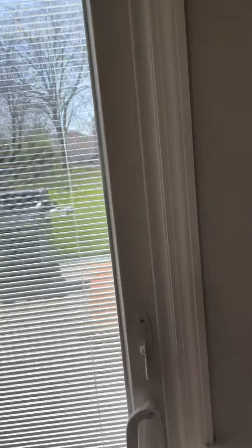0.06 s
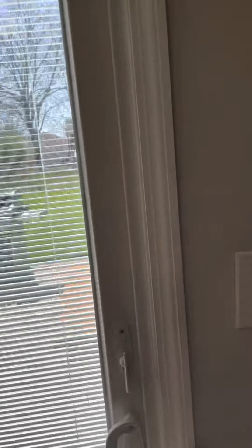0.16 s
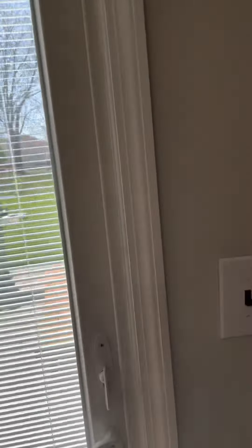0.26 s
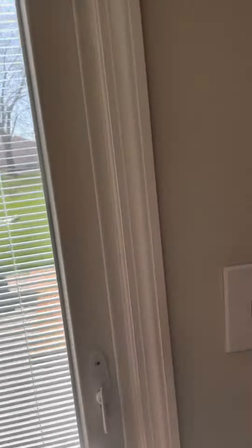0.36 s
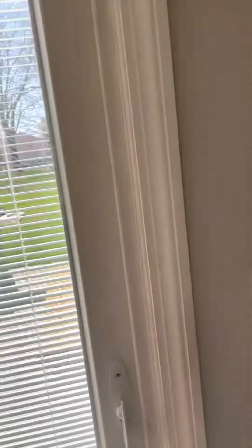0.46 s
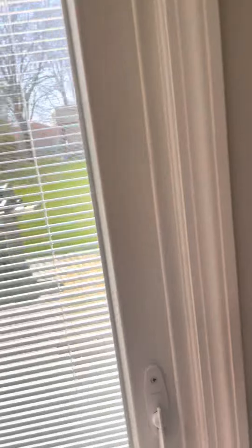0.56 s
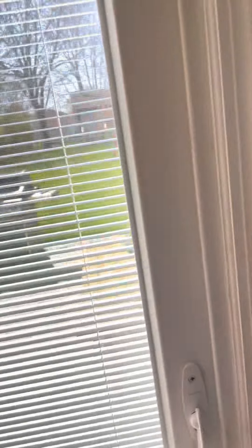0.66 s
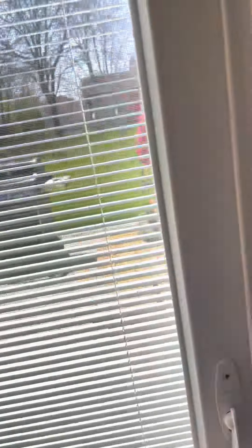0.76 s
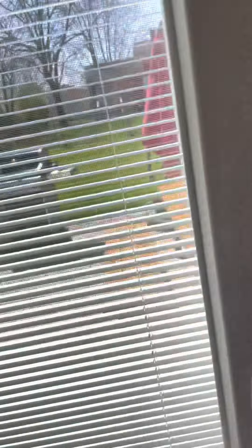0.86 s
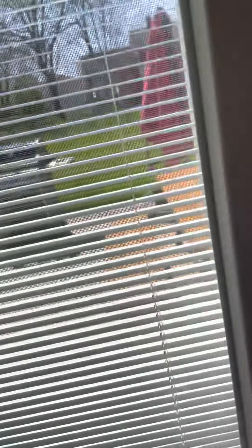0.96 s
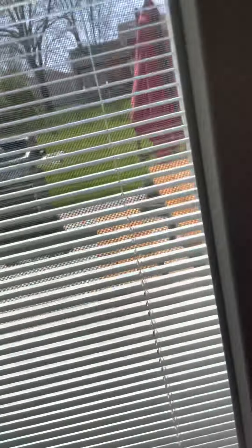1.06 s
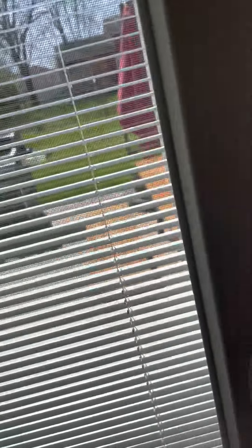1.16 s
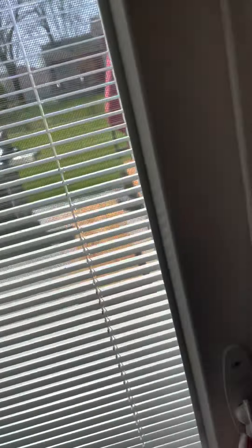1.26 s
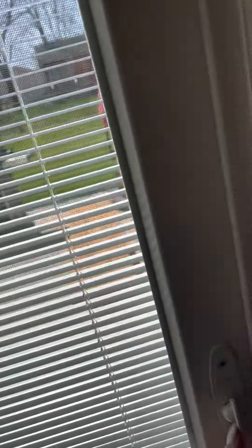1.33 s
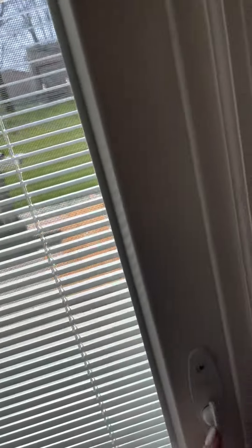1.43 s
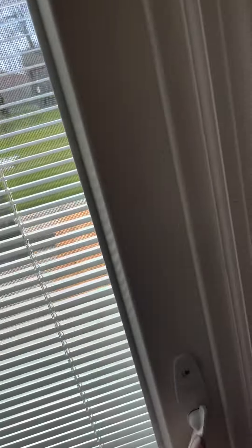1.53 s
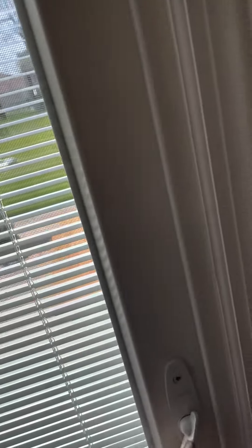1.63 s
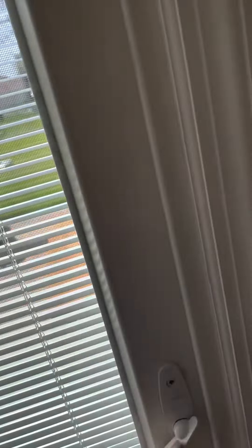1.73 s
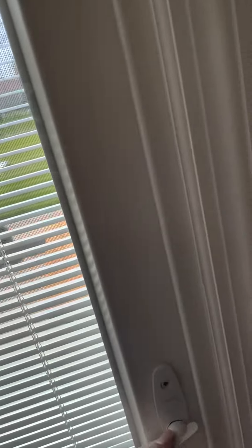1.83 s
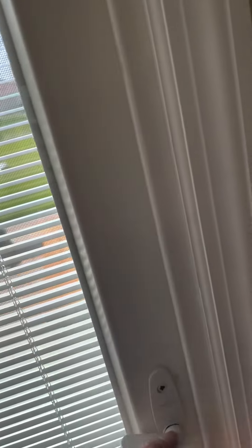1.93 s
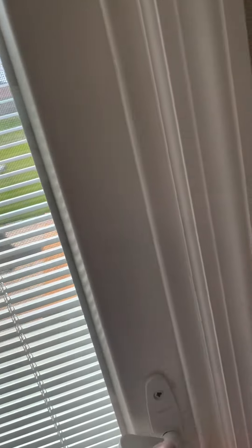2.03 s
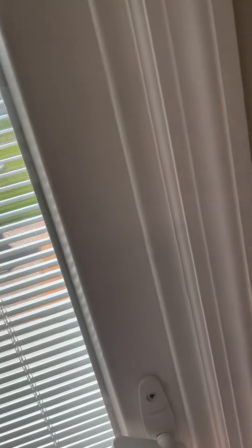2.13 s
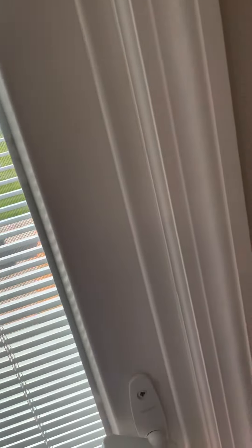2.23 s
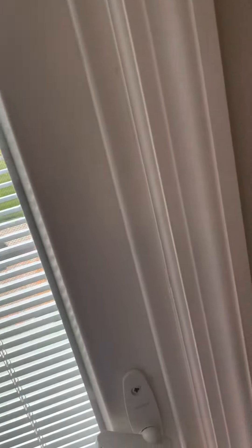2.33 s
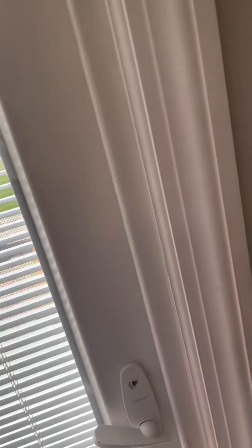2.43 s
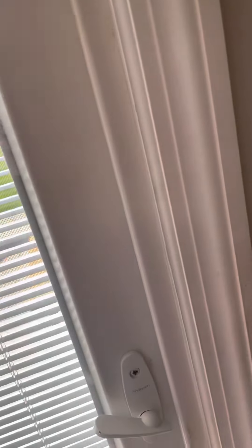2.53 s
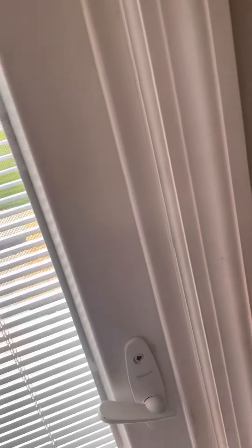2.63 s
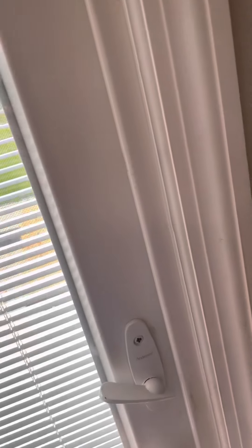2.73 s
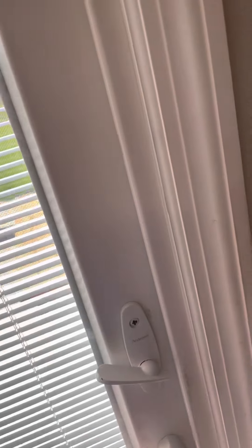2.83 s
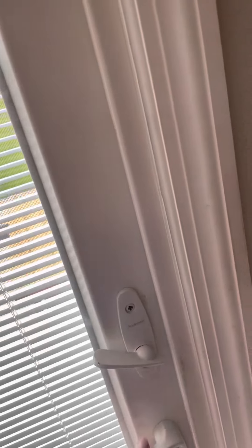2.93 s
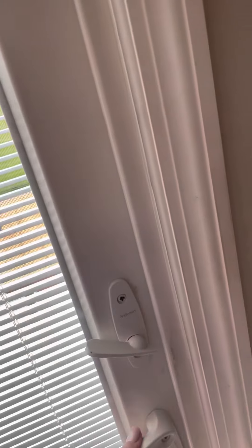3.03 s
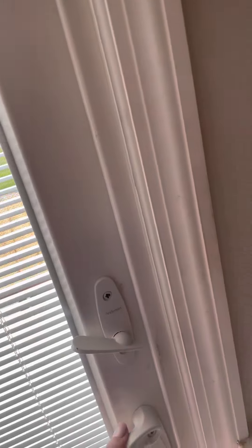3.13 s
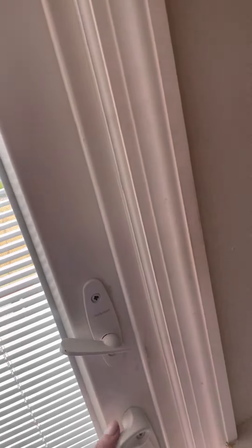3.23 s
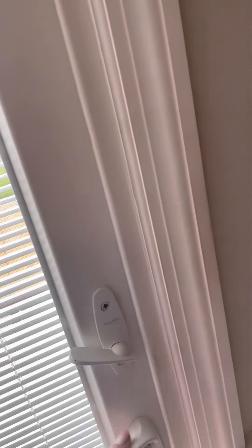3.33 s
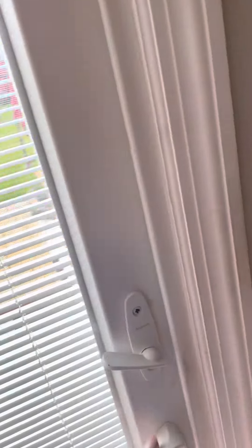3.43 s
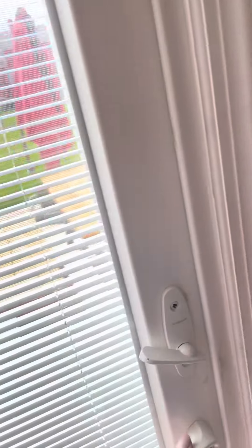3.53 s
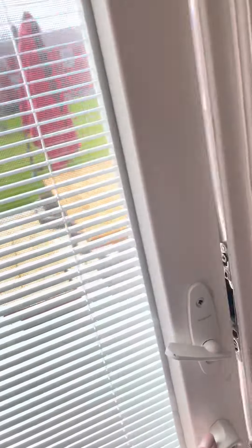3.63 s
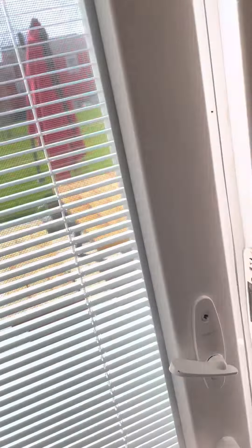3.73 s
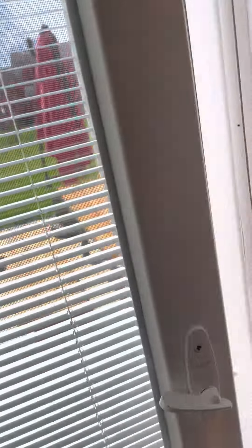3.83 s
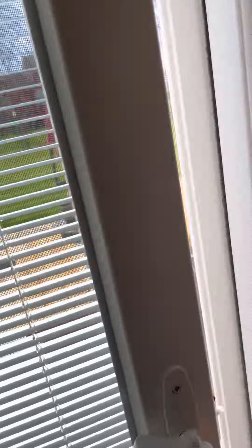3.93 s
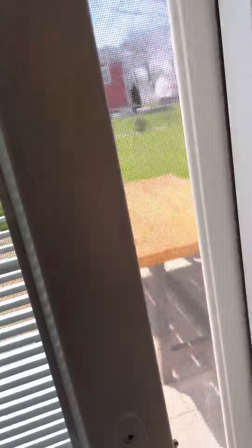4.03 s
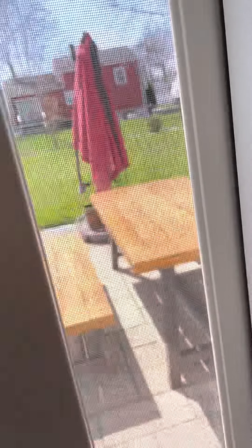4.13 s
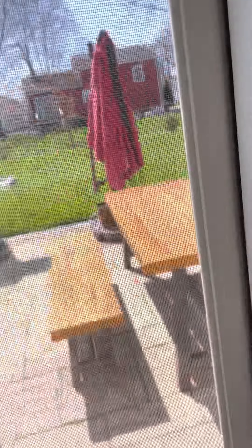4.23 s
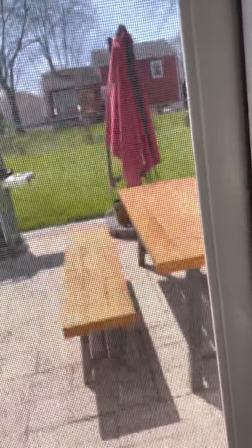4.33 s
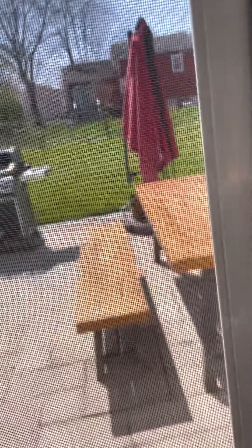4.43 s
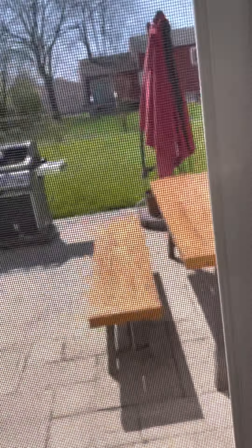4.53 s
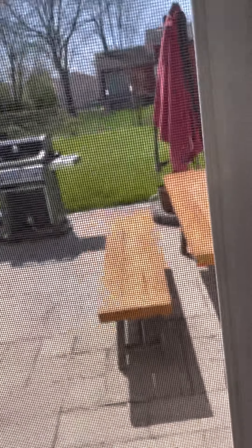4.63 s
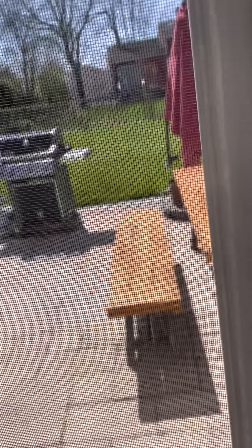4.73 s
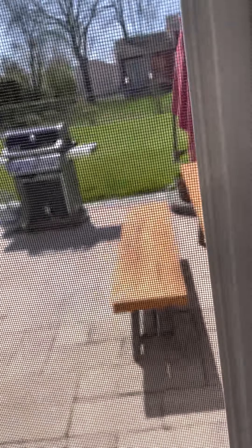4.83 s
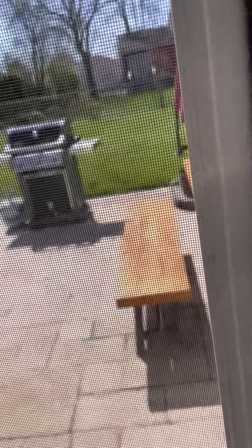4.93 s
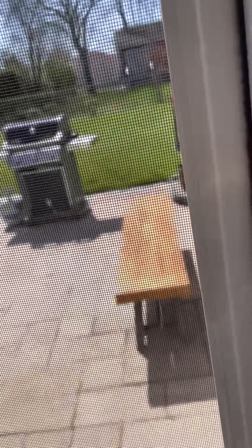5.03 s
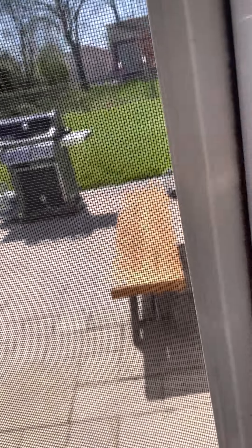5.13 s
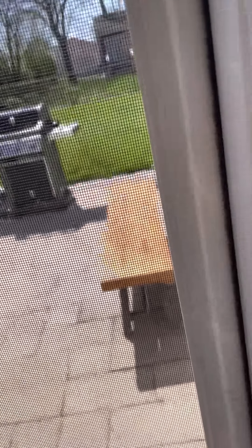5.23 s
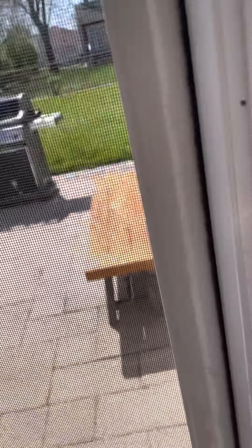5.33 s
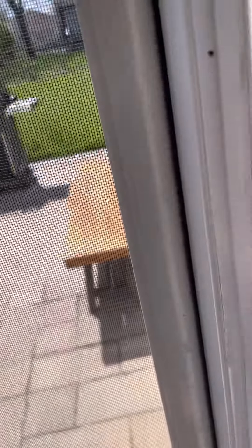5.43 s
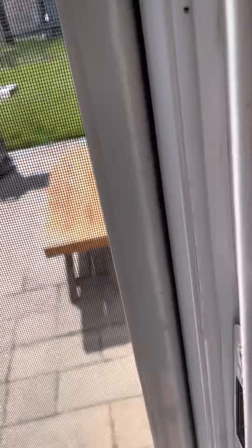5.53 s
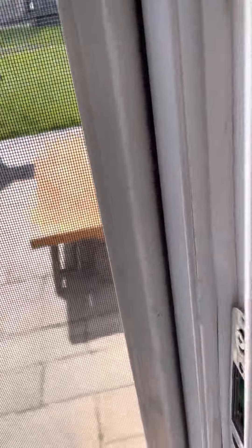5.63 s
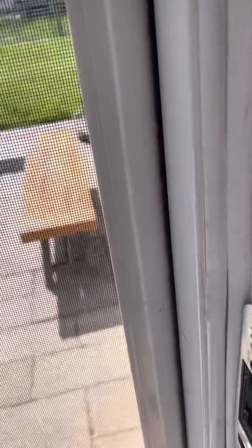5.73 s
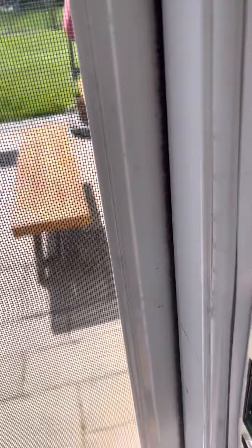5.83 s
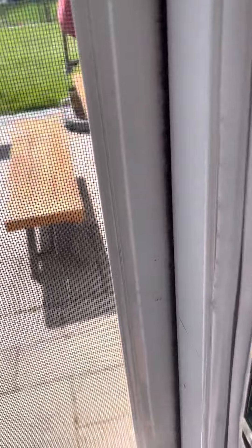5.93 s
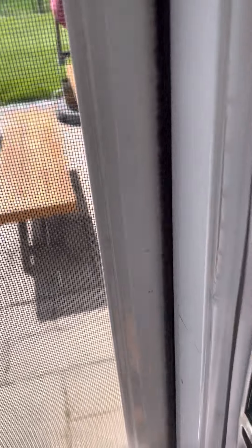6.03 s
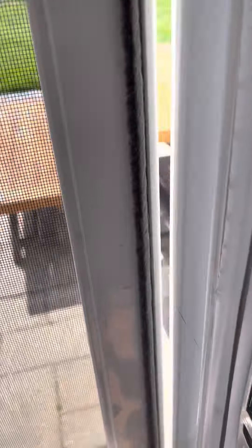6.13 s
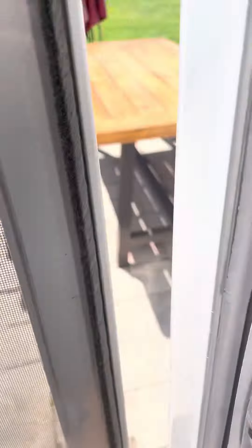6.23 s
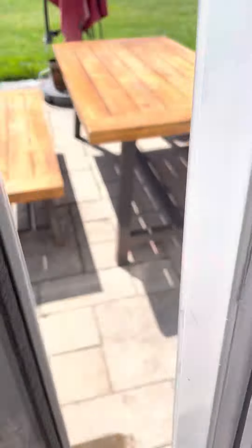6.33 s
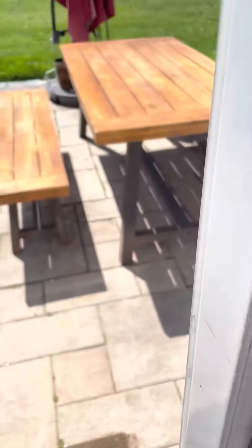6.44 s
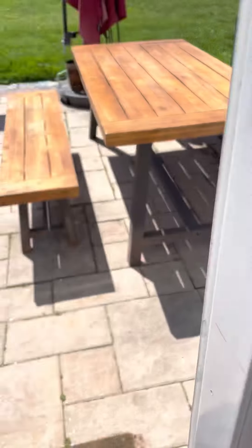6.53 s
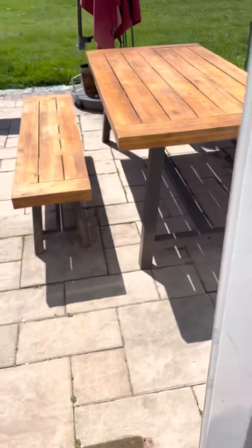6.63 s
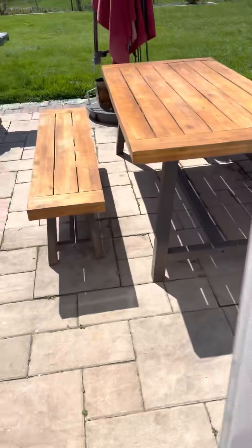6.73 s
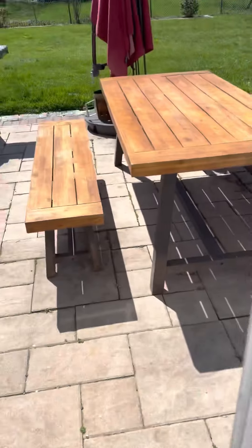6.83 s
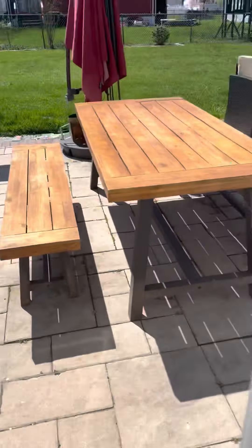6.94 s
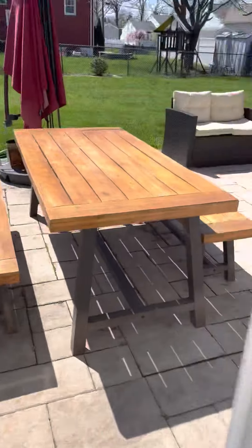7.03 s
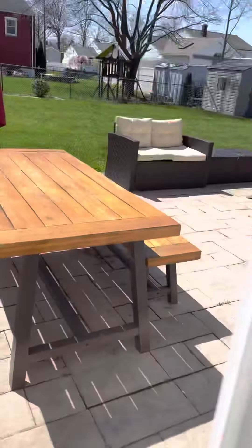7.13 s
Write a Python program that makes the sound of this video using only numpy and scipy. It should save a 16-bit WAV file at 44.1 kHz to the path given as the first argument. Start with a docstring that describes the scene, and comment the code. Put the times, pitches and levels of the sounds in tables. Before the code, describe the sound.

In a small, lightly reverberant room, a few dull heel steps knock and boom on wooden boards with small clicks. A latch snaps over with a sharp metallic clatter and low thump. After quiet handling and cloth rub, a heavy glass door rolls with a bumpy, gritty rumble, slowing to rest. A screen then catches and scrapes hollowly aside. Birds chirp, whistle and squeal. Close handheld stereo phone pickup.

```python
"""Glass patio door and insect screen

Someone walks over a wooden floor, flips a latch, rolls a glass door along its track and slides a screen aside.
Door and screen are friction noise and random impacts driven by speed curves and coloured by body resonances.
Steps, latch parts, knocks and bumps are short decaying hits with a noise room tail; cloth is stroked noise.
Hum and hiss grow as the two doors open; birds whistle, twitter and squeal in sines. A phone hears it in stereo.
"""
import sys
import numpy as np
from scipy import signal
from scipy.fft import rfft, irfft, next_fast_len
from scipy.io import wavfile
from scipy.ndimage import uniform_filter1d, map_coordinates

SR = 44100
rng = np.random.default_rng(int(sys.argv[2]) if len(sys.argv) > 2 else 0)


def bounce(signal):
    """Save signal as a 16-bit WAV file at the path given by the first command-line argument."""
    frames = np.transpose(np.atleast_2d(signal))
    limited = np.clip(frames, -1, 1)
    pcm = np.round(limited * 32767).astype(np.int16)
    wavfile.write(sys.argv[1], SR, pcm)


N = 316440

# glass door, pulled open and coasting to rest: start_s, speed (share of the fastest)
DOOR_SPEED = [(3.44, 0.051), (3.545, 0.13), (3.568, 0.56), (3.72, 0.42), (3.78, 0.61), (3.94, 0.62),
              (4.04, 0.92), (4.11, 0.73), (4.15, 0.88), (4.26, 1), (4.38, 0.79), (4.62, 0.39),
              (4.86, 0.068), (5.02, 0.023)]
# screen, which sticks, is shoved aside and slows: start_s, speed (share of the fastest)
SCREEN_SPEED = [(5.93, 0.011), (5.96, 0.018), (6.21, 0.18), (6.24, 0.49), (6.3, 0.48), (6.32, 0.81),
                (6.355, 0.52), (6.42, 1), (6.49, 0.75), (6.54, 0.54), (6.6, 0.34), (6.82, 0.027), (6.92, 0)]
# colour of the rollers on the track: freq_hz, level_db
ROLLER_COLOUR = [(80, -44), (150, -42), (220, -9), (300, 1), (450, 0.5), (620, -5), (1070, -7.5),
                 (1450, -19.5), (2600, -42)]
# resonances of the glass pane: centre_hz, width_hz, boost_db
PANE_MODES = [(95, 27, 15), (218, 24, 13), (278, 16, 12), (343, 22, 10), (436, 32, 8), (505, 40, 6),
              (634, 24, 5), (748, 40, 4), (870, 170, 3), (1060, 70, 3), (1215, 20, 6), (1265, 25, 5),
              (1920, 130, -4), (2120, 110, 4)]
# colour of the door's drone and the yard's hum: freq_hz, level_db
HUM_COLOUR = [(20, -61), (43, 5.5), (60, 2), (95, -0.5), (144, 0.5), (250, -4.5), (370, -14.5), (600, -21),
              (1200, -50.5)]
# colour of a dull contact: freq_hz, level_db
CLACK_COLOUR = [(200, 6.5), (600, -5), (1100, -6), (1700, -4), (2300, -5.5), (3000, -10.5), (3800, -34),
                (8000, -58)]
# colour of small ringing parts: freq_hz, level_db
RING_COLOUR = [(1500, 1.5), (3200, 9.5), (4600, 4.5), (6300, 3.5), (8500, 0.5), (12000, -5.5)]


def glass_door(rumble_db=-54, drone_db=-45, roller_db=-37.5, bump_db=-43, grit_db=-41.5, crunch_db=-46.0,
               brush_db=-53.5, pane_db=-2.5, rumble_power=0.084, grit_power=0.98, brush_power=0.66):
    """Rollers and grit shake the pane while the weather strip brushes; each grows as a power of the speed."""
    # colours of deep shaking, gritty track and weather strip: freq_hz, level_db
    rumble_colour = [(20, -13), (40, 15), (58, 31.5), (78, -42), (115, 20.5), (170, 2), (300, -47)]
    grit_colour = [(600, 9), (1200, 6.5), (2300, 3.5), (3100, 0.5), (4200, -15), (7000, -58)]
    brush_colour = [(1900, -17), (3200, -0.5), (4600, -5), (5800, -1.5), (7500, -3.5), (10000, -10.5),
                    (13000, -6), (15500, -11), (16200, -31)]
    # the heavy panel lurches: start_s, fall_after_s, rumble_db (ahead of the pane), weather_strip_db
    lurches = [(1.693, 0.15, -42, -78), (3.56, 0.027, -35.5, -53.5), (4.72, 0.12, -48.5, -56)]

    speed = speed_of(DOOR_SPEED)
    rumble = amp(rumble_db) * speed ** rumble_power
    brush = amp(brush_db) * speed ** brush_power
    for start, fall_after, shake_db, strip_db in lurches:
        lurch = stroke(start, fall_after, attack=0.043, fall_db_per_s=198)
        rumble = rumble + amp(shake_db) * lurch
        brush = brush + amp(strip_db) * lurch

    shake = rumble * rush(rumble_colour, grain_db=-3.0, rate=25)
    rolling = amp(roller_db) * rush(ROLLER_COLOUR, grain_db=3.0, rate=190)
    rolling += amp(bump_db) * crackle(ROLLER_COLOUR, rate=79, size_db=4.0, t60=0.045)
    shake += speed * rolling
    gritty = amp(grit_db) * rush(grit_colour, grain_db=2.5, rate=330)
    gritty += amp(crunch_db) * crackle(grit_colour, rate=210, size_db=5, t60=0.027)
    shake += speed ** grit_power * gritty
    drone = amp(drone_db) * speed * rush(HUM_COLOUR, grain_db=-2.0, rate=41)
    strip = brush * rush(brush_colour, grain_db=1.5, rate=310)
    return amp(pane_db) * resonant(shake, PANE_MODES) + drone + strip


def track_bumps(clack_t60=0.028, thump_t60=0.09, clack_trim_db=2, thump_trim_db=-3, room_db=-8):
    """A roller drops off a grain of grit: the wheel clacks and the pane thumps."""
    # strikes on the track: start_s, clack_db, thump_db (both ahead of the trims)
    bumps = [(3.726, -35, -42), (3.765, -46, -30), (3.838, -37, -35), (3.903, -45, -32), (3.970, -34, -38),
             (3.999, -34, -32), (4.031, -37, -34), (4.0555, -32, -30), (4.087, -44, -29), (4.108, -42, -27),
             (4.165, -39, -38), (4.192, -44, -30), (4.237, -35, -31), (4.266, -36, -32), (4.312, -32, -33),
             (4.34, -35, -42), (4.366, -40, -29), (4.42, -37, -35), (4.5309, -41, -37), (4.573, -44, -44)]
    # colour of a roller's clack: freq_hz, level_db
    wheel_colour = [(150, -8), (350, 6), (1050, 1), (1500, -4), (2150, 2), (4000, -15), (6300, -18),
                    (9000, -45)]
    out, thumps = np.zeros((2, N)), np.zeros((2, N))
    t = np.arange(SR // 10) / SR

    def burst(colour, attack, t60):
        """A stereo noise hit with a soft onset and an exponential decay."""
        envelope = (1 - np.exp(-t / attack)) * amp(-60 * t / t60)
        return envelope * coloured(rng.standard_normal((2, len(t))), colour)

    for start, clack_db, thump_db in bumps:
        clack = amp(clack_db + clack_trim_db) * burst(wheel_colour, .0004, clack_t60)
        add(out, start, spread(clack))
        add(out, start, amp(room_db) * echo(clack[0]))
        thump = spread(burst(ROLLER_COLOUR, .002, thump_t60))
        add(thumps, start, amp(thump_db + thump_trim_db) * thump)
    return out + resonant(thumps, PANE_MODES)


def screen_door(frame_db=-39.5, catch_db=-5, scrape_db=-51, scrape_power=0.73):
    """A hollow frame rubs and catches on its rail and rings; the scrape above fades less at low speed."""
    # colours of the frame's rub and the bright scrape: freq_hz, level_db
    frame_colour = [(120, -29), (230, 1.5), (450, -1), (580, -2.5), (800, -4.5), (1050, -3.5), (1450, -5.5),
                    (2100, -8.5), (3100, -15), (4500, -21), (6000, -47)]
    scrape_colour = [(1900, -40), (3200, -5), (4500, -4), (6200, -1), (8000, 5), (10000, -6), (11300, -8),
                     (12500, 3), (14400, -3), (15600, -25)]
    # resonances of the hollow frame: centre_hz, width_hz, boost_db
    tube_modes = [(440, 70, 6), (590, 90, -3), (730, 60, 12), (865, 60, 10), (1040, 90, 5), (1206, 35, 11),
                  (1420, 90, 4), (1640, 110, -4), (1880, 160, 3), (2730, 90, 3), (3045, 60, 10),
                  (3190, 60, 7)]
    speed = speed_of(SCREEN_SPEED)
    catches = crackle(frame_colour, rate=140, size_db=3.5, t60=0.02)
    contact = rush(frame_colour, grain_db=0.5, rate=300) + amp(catch_db) * catches
    rub = amp(frame_db) * speed * contact
    scrape = amp(scrape_db) * speed ** scrape_power * rush(scrape_colour, grain_db=2.0, rate=560)
    return resonant(rub, tube_modes) + scrape


def clicks(t60=0.022, lead=0.019, slip_db=-19, clack_db=5, ring_db=6, tick_db=-8, room_db=-6):
    """Plastic and metal parts slip briefly, then snap home; a harder contact clacks less and ticks more."""
    # latch, handle and screen catch: contact_s, level_db (ahead of the layer levels), hardness_db
    contacts = [(0.2325, -48.5, 16.5), (0.3576, -58, 25.5), (0.362, -61.5, 24), (0.71, -53, -2),
                (1.1901, -52.5, -24.5), (1.3566, -70.5, -34.5), (1.4354, -56.5, -11), (1.4996, -48.5, -7),
                (1.517, -47.5, 7), (1.7117, -39, 10.5), (1.7191, -38, -9), (1.773, -35, 6.5),
                (1.794, -52, 0), (1.8334, -48.5, 8.5), (1.9033, -57, -12), (1.949, -54.5, -8),
                (1.985, -51.5, 12), (2.195, -57.5, 11), (2.6, -50, 7.5), (2.8403, -53, 10.5),
                (3.077, -57, 6), (3.2019, -48, 9.5), (3.562, -41.5, 8), (3.6676, -34.5, 12),
                (4.7924, -49, -19.5), (4.931, -58, -9), (5.207, -45, 12.5), (5.8072, -47, 10),
                (5.886, -53, 13), (5.95, -45.5, 11), (5.969, -49.5, 3.5), (6.009, -47, -4),
                (6.0532, -47, 0), (6.092, -45, 1), (6.1146, -35.5, 11), (6.215, -48, -14),
                (6.2316, -40.5, -10), (6.3113, -46, -6), (6.563, -44.5, 7), (6.5779, -39, 15),
                (6.588, -42.5, 8), (6.656, -43, 14), (6.891, -58.5, 3), (6.964, -57, -14)]
    # colour of the sharpest layer: freq_hz, level_db
    tick_colour = [(5000, -34), (8500, -1.5), (13000, -4), (15500, -4), (16500, -9)]
    clack_loss, tick_gain = .45, 1.2  # dB per dB of hardness
    before = .02  # s of slipping ahead of the contact
    out, t = np.zeros((2, N)), np.arange(SR // 12) / SR - before
    for contact, db, hardness in contacts:
        layers = [(CLACK_COLOUR, clack_db - clack_loss * hardness, t60 * 2.38),
                  (RING_COLOUR, ring_db, t60),
                  (tick_colour, tick_db + tick_gain * hardness, t60)]
        hit = 0
        for colour, level, layer_t60 in layers:
            slip = amp(slip_db + 20 * t / lead)  # swells by 20 dB per lead
            decay = amp(-60 * np.abs(t) / layer_t60)
            shape = uniform_filter1d(np.where(t < 0, slip, decay), size=50)
            hit = hit + amp(db + level) * shape * coloured(rng.standard_normal((2, len(t))), colour)
        add(out, contact - before, spread(hit))
        add(out, contact - before, amp(room_db) * echo(hit[0]))
    return out


def chatter(level_db=-2):
    """Loose latch parts and gritty spots of the track chatter in quick runs of small clacks."""
    # runs: start_s, length_s, level_db (ahead of the overall level)
    runs = [(1.173, .05, -61), (1.872, 0.13, -51), (6.24, 0.048, -49)]
    envelope = np.zeros(N)
    for start, length, db in runs:
        add(envelope, start, amp(db) * signal.windows.tukey(round(length * SR), .1))
    return amp(level_db) * envelope * crackle(CLACK_COLOUR, rate=160, size_db=6, t60=0.012)


def knocks(tap_db=2, bolt_db=1.5, snap_db=0, thud_db=-6.5, room_db=-15):
    """Frame, lock case and latch spring ring in decaying modes; floor or pane answers a jolt with one low note."""
    # screen frame on its rail, bolt in the lock case, latch spring letting go: start_s, level_db (untrimmed)
    frame_taps = [(5.748, -20.5), (5.918, -30)]
    bolt_knocks = [(1.7195, -28), (1.7235, -31), (1.7742, -23.5), (1.7805, -30), (1.801, -35),
                   (1.8715, -39), (1.877, -37), (1.882, -30), (1.8985, -39), (1.9065, -36), (1.9245, -33.5),
                   (1.9665, -26), (1.9835, -35), (2.704, -50), (3.122, -46)]
    spring_snaps = [(1.7132, -24.5)]
    # modes of rail, lock case and spring: freq_hz, level_db, t60_s
    rail_modes = [(1378, -12, .02), (1540, -25, .09), (1707, -6, .015), (1879, -2, .022), (2080, -11, .014),
                  (3461, -25, .02), (5900, -22, .011)]
    lock_modes = [(520, -13, .02), (964, -9, .028), (1360, -9, .028), (1700, -6, .013), (1940, -9, .02),
                  (2290, -13, .016), (3180, -17, .03), (3480, -16, .025), (4540, -24, .025)]
    spring_modes = [(5250, -7, .012), (5850, -2, .014)]
    # jolts of floor or pane: start_s, level_db (untrimmed), pitch_hz, t60_s
    thuds = [(0.203, -27.5, 133, 0.24), (1.719, -27, 210, 0.04), (1.731, -19, 163, 0.076),
             (1.735, -26.5, 72.4, 0.22), (3.589, -12, 112, 0.016), (3.769, -18.5, 244, 0.034),
             (6.667, -19.5, 81, 0.061), (6.693, -21, 48.3, 0.2)]
    out, t = np.zeros((2, N)), np.arange(SR // 3) / SR
    bodies = [(frame_taps, rail_modes, tap_db),
              (bolt_knocks, lock_modes, bolt_db),
              (spring_snaps, spring_modes, snap_db)]
    for blows, modes, trim_db in bodies:
        for start, db in blows:
            ring = np.zeros(len(t))
            for hz, level, t60 in modes:
                # each blow excites the modes a little differently
                ring += amp(level + rng.normal(0, 1.5) - 60 * t / t60) * np.sin(2 * np.pi * hz * t)
            ring *= amp(db + trim_db) * (1 - np.exp(-t / 0.0012))
            add(out, start, ring)
            add(out, start, amp(room_db) * echo(ring))
    for start, db, hz, t60 in thuds:
        envelope = amp(db + thud_db - 60 * t / t60) * (1 - np.exp(-t / 0.0003))
        add(out, start, envelope * np.sin(2 * np.pi * hz * t))
    return out


def footsteps(glide=0.62, swell=1.57, sharpness=6, knock_ratio=1.64, knock_t60=0.019, knock_trim_db=8.5,
              knock_room_db=1, boom_trim_db=-2.5, boom_lag=0.01, boom_hold=0.057, boom_fall_db_per_s=110):
    """A heel knocks and sends a bending wave through the floor: high part first, then the boards boom."""
    # heels: start_s, wave_db, base_pitch_hz (ahead of glide and ratio), knock_db and boom_db (untrimmed, re wave)
    steps = [(0.1905, -19, 284, -16.5, -1), (0.238, -23.5, 297, -13.5, -3), (0.71, -25.5, 288, -5.5, -6.5),
             (1.1738, -20.5, 287, -19, -8), (1.192, -16, 288, -7, -5.5), (2.581, -29.5, 205, -17, -3.5),
             (2.904, -36.5, 305, -3.5, -4.5), (3.401, -30.5, 283, -3, -7.5), (4.421, -24, 223, -31, -2),
             (6.826, -28.5, 348, -11.5, -4.5)]
    # resonances of the floor: centre_hz, width_hz, boost_db
    board_modes = [(327, 34, 1.5), (402, 66, -4), (497, 33, 4), (640, 130, -4), (798, 60, 9.5)]
    out, t = np.zeros((2, N)), np.arange(SR // 20) / SR
    for start, db, hz, knock_db, boom_db in steps:
        cycles = hz * t
        phase = 0.89 * cycles + glide * (1 - np.exp(-cycles / 0.68))  # pitch falls as the wave passes
        u = cycles / swell
        wave = amp(db) * (u * np.exp(1 - u)) ** sharpness * np.sin(2 * np.pi * phase)
        knock_shape = amp(db + knock_db + knock_trim_db - 60 * t / knock_t60) * (1 - np.exp(-t / 0.00047))
        knock = knock_shape * np.sin(2 * np.pi * knock_ratio * cycles)
        add(out, start, wave + knock)

        boom = echo(wave) + amp(knock_room_db) * echo(knock)
        age = np.arange(boom.shape[-1]) / SR
        fade = np.minimum(age / 0.0028, 1) * amp(-boom_fall_db_per_s * np.maximum(age - boom_hold, 0))
        add(out, start + boom_lag, amp(boom_db + boom_trim_db) * fade * resonant(boom, board_modes))
    return out


def rustle(fidget_db=-7):
    """Cloth and skin rub in short strokes of noise, with stray little ticks of whatever the hand touches."""
    # sleeves, soles and a hand on the handle: start_s, attack_s, fall_after_s, rub_db, swish_db
    strokes = [(0.179, 0.027, 0.2, -60.5, -59.5), (0.703, 0.0029, 0.031, -59, -55.5),
               (0.807, 0.016, 0.12, -57, -67.5), (1.342, 0.1, 0.32, -56.5, -72.5),
               (1.696, 0.046, 0.29, -51, -58), (2.7, 0.082, 0.16, -52.5, -66.5),
               (2.88, 0.02, 0.096, -58.5, -83), (3.039, 0.013, 0.1, -52, -67),
               (3.167, 0.013, 0.17, -58, -68), (3.474, 0.011, 0.027, -46.5, -76),
               (5.059, 0.017, 0.078, -50.5, -61.5), (5.572, 0.023, 0.18, -58.5, -81.5),
               (6.524, 0.019, 0.046, -68, -48.5), (6.76, .025, 0.031, -61, -52.5)]
    # colours of the dull rub and the bright swish: freq_hz, level_db
    rub_colour = [(150, 5), (400, 5.5), (800, -2), (1250, -6.5), (1650, -13), (3500, -20), (6000, -53)]
    swish_colour = [(1500, 5), (2600, 6.5), (4000, 3.5), (6000, 4.5), (8500, 2.5), (13000, -0.5),
                    (16000, -19)]
    rub, swish = np.zeros(N), np.zeros(N)
    for start, attack, fall_after, rub_db, swish_db in strokes:
        move = stroke(start, fall_after, attack, fall_db_per_s=126)
        rub += amp(rub_db) * move
        swish += amp(swish_db) * move
    fidget = amp(fidget_db) * crackle(RING_COLOUR, rate=75, size_db=9.5, t60=0.015)
    bright = rush(swish_colour, grain_db=2.0, rate=69) + fidget
    return rub * rush(rub_colour, grain_db=3.5, rate=130) + swish * bright


def birds(whistle_db=-51, twitter_db=-5, squeal_db=-46, sizzle_db=-54, waver=0.00227):
    """A held whistle, gliding chirps and a rusty call: noise sizzle, then wavering inharmonic partials."""
    # twitter: start_s, length_s, from_hz, to_hz (ahead of the flutter), level_db (ahead of twitter_db)
    chirps = [(5.115, .09, 3400, 3800, -57), (5.468, .04, 3300, 4000, -61), (5.516, .04, 3000, 4000, -60),
              (6.988, .035, 3800, 3870, -52), (7.133, .005, 2900, 2860, -41)]
    # partials of the rusty call: freq_hz (ahead of bend and waver), level_db (relative)
    partials = [(1642, -12), (2492, -10), (2686, -11), (3311, -6), (3505, -9), (3677, -11), (3935, -2),
                (4974, -8), (6008, -9), (6417, 0), (6638, -3), (6837, -3), (7047, -8), (7456, -13),
                (8075, -6)]
    # bend of the rusty call: time_s, pitch_ratio
    bend_points = [(6.96, .997), (7.05, 1.003), (7.11, 1), (7.18, .991)]
    # colour of the sizzle: freq_hz, level_db
    sizzle_colour = [(1200, -7), (2600, -2), (3800, 0), (4400, -5), (5300, -7), (6600, -4), (7500, -10),
                     (8200, -2), (10500, -28), (12800, -10), (15000, -36)]
    whistle_s, whistle_hz, slide_hz, slide_s = 6.457, 3731, 300, .02  # slides down onto its note

    t = np.arange(N) / SR
    note = whistle_hz + slide_hz * np.exp(-np.maximum(t - whistle_s, 0) / slide_s)
    breath = stroke(whistle_s, 0.25, attack=0.025, fall_db_per_s=104)
    whistle = amp(whistle_db) * breath * tone(note * (1 + waver * wobble(61)))
    twitter = amp(twitter_db) * glides(chirps, rough=.055, wet_db=-2)

    bend = curves(bend_points)[0]
    squeal = np.zeros((2, N))
    for hz, db in partials:
        level = db + rng.normal(0, 1.5, (2, 1)) + 2.5 * wobble(30)  # dB, differing from left to right
        squeal += amp(level) * tone(hz * bend + 8 * wobble(140))
    call = stroke(6.985, 0.093, attack=0.06, fall_db_per_s=72)
    sizzle = stroke(6.955, .07, attack=0.06, fall_db_per_s=72) * rush(sizzle_colour, grain_db=2, rate=300)
    return whistle + twitter + amp(squeal_db) * call * unit(squeal) + amp(sizzle_db) * sizzle


def background():
    """Steady low hum and a faint airy hiss; both grow as the two doors open onto the yard."""
    # levels of hum and hiss: shut_db, added_by_open_door_db, added_by_open_screen_db
    hum_levels = (-53, 5, 4)
    hiss_levels = (-76.5, 8, 5)
    # colour of the hiss: freq_hz, level_db
    hiss_colour = [(200, -24), (500, 0.5), (1000, -1), (2000, -7), (4000, -16.5), (8000, -46), (14000, -23)]
    door, screen = opening(DOOR_SPEED), opening(SCREEN_SPEED)

    def level(shut_db, door_db, screen_db):
        """Gain that follows both openings."""
        return amp(shut_db + door_db * door + screen_db * screen)

    hum = level(*hum_levels) * rush(HUM_COLOUR, grain_db=.7, rate=14)
    hiss = level(*hiss_levels) * rush(hiss_colour, grain_db=.7, rate=8)
    return hum + hiss


def speed_of(door):
    """A door's speed at every sample, zero before and after its move."""
    s, speed = np.transpose(door)
    return np.maximum(np.interp(np.arange(N) / SR, s, speed, left=0, right=0), 0)


def opening(door):
    """How far a door has travelled, 0 to 1: its speed summed over time."""
    travel = np.cumsum(speed_of(door))
    return travel / travel[-1]


def stroke(start, fall_after, attack, fall_db_per_s):
    """Envelope that rises over the attack and dies away from fall_after seconds past its start."""
    t = np.arange(N) / SR - start
    return np.clip(t / attack, 0, 1) * amp(-fall_db_per_s * np.maximum(t - fall_after, 0))


def rush(colour, grain_db, rate):
    """Stereo friction noise whose force wanders in dB, with rate knots a second."""
    force = amp(grain_db * wobble(rate))
    return spread(coloured(rng.standard_normal((2, N)) * force, colour))


def crackle(colour, rate, size_db, t60):
    """Stereo stream of tiny random impacts, about rate a second, at rms 1 ahead of the spread."""
    sizes = amp(size_db * np.clip(rng.standard_normal(N), -2, 2))
    blows = (rng.random(N) < rate / SR) * sizes
    decay = amp(-120 * np.arange(SR // 20) / SR / t60)  # power, so twice the dB
    power = signal.fftconvolve(blows ** 2, decay)[:N]
    return spread(coloured(rng.standard_normal((2, N)) * np.sqrt(np.abs(power)), colour))


def glides(rows, rough, wet_db):
    """Short notes that slide from one pitch to another with a slight flutter, and their echo."""
    out = np.zeros((2, N))
    flutter = 1 + rough * wobble(600)
    for start, length, from_hz, to_hz, db in rows:
        n = round(length * SR)
        pitch = np.linspace(from_hz, to_hz, n) * flutter[round(start * SR):][:n]
        note = amp(db) * signal.windows.tukey(n, .7) * tone(pitch)
        add(out, start, note)
        add(out, start, amp(wet_db) * echo(note))
    return out


def tone(hz):
    """A sine of rms 1 that follows a pitch curve."""
    return np.sqrt(2) * np.sin(2 * np.pi * np.cumsum(hz) / SR)


def resonant(x, peaks):
    """x through a body whose resonances are bell-shaped boosts in dB."""
    def body(hz):
        return amp(sum(db / (1 + (2 * (hz - centre) / width) ** 2) for centre, width, db in peaks))
    return filtered(x, body)


def echo(sound):
    """A fresh stereo noise tail of the room for one short sound; each frequency dies at its own speed."""
    # decay of the room: freq_hz, t60_s
    room_decay = [(100, 0.097), (260, 0.39), (700, 0.41), (1800, 0.34), (5000, 0.22), (13000, 0.1)]
    hz, t, z = signal.stft(rng.standard_normal((2, SR // 2)), SR, nperseg=256)
    decay = amp(-60 * t / along(room_decay, hz)[:, None]) * (1 - np.exp(-t / 0.00067))
    tail = signal.istft(z * decay, SR, nperseg=256)[1]
    return spread(signal.fftconvolve(sound[None], tail / np.linalg.norm(tail[0]), axes=1))


def spread(pair):
    """Two signals become middle and filtered side, then left and right."""
    # stereo width: freq_hz, side_db
    side_width = [(60, -31), (220, -21), (380, -14), (700, -5), (2000, -10), (2600, -6), (4700, -2),
                  (5900, -11), (7500, -8), (10200, -25), (12500, -8), (15000, -17)]
    side = filtered(pair[1], lambda hz: amp(along(side_width, hz)))
    return np.array([pair[0] + side, pair[0] - side])


def amp(db):
    """Decibels to gain."""
    return 10 ** (np.asarray(db) / 20)


def unit(x):
    """Scale to rms 1."""
    return x / np.sqrt(np.mean(x ** 2) + 1e-20)


def along(points, hz):
    """Read (Hz, value) points on a log frequency axis."""
    f, v = np.transpose(points)
    return np.interp(np.log(hz + 1), np.log(f + 1), v)


def curves(rows):
    """One value per sample for each column after the time."""
    s, *cols = np.transpose(rows)
    return [np.interp(np.arange(N) / SR, s, c) for c in cols]


def wobble(rate):
    """A smooth random curve, rate knots a second."""
    return map_coordinates(rng.standard_normal(int(N * rate / SR) + 4), [np.arange(N) * rate / SR])


def filtered(x, response):
    """x times a response of frequency."""
    n = x.shape[-1]
    m = next_fast_len(n + 4096)
    return irfft(rfft(x, m) * response(np.fft.rfftfreq(m, 1 / SR)), m)[..., :n]


def coloured(x, colour):
    """x shaped by a (Hz, dB) curve, at rms 1."""
    return unit(filtered(x, lambda hz: amp(along(colour, hz))))


def add(track, start, sound):
    """Mix a sound in at a start time in seconds."""
    part = track[..., round(start * SR):][..., :sound.shape[-1]]
    part += sound[..., :part.shape[-1]]


def scene():
    """All sources; the low mids lean to the left, where the door is."""
    # stereo balance: freq_hz, left_over_right_db
    left_lean = [(60, 0), (130, .6), (280, 2.4), (550, 2.5), (1100, 1.4), (2200, 0), (4500, -.6),
                 (12000, 0)]
    mix = glass_door() + track_bumps() + screen_door()
    mix += clicks() + chatter() + knocks() + footsteps()
    mix += rustle() + birds() + background()
    return filtered(mix, lambda hz: amp(np.outer([.5, -.5], along(left_lean, hz))))


def record(dry):
    """The phone's two microphones differ in phase; both have a low cut and a band limit."""
    # phase between the microphones: freq_hz, left_lead_rad
    left_lead = [(450, 0), (900, -.4), (3200, .75), (5300, -.3), (7000, 1.2), (9000, 3.14), (11400, 3.14),
                 (14000, 6.28)]
    low_cut_hz, top_hz = 38.4, 16400
    turned = filtered(dry, lambda hz: np.exp(1j * np.outer([.5, -.5], along(left_lead, hz))))
    low_cut = signal.butter(4, low_cut_hz, "highpass", fs=SR, output="sos")
    trimmed = signal.sosfilt(low_cut, turned)
    return filtered(trimmed, lambda hz: hz < top_hz)


dry = scene()
out = record(dry)
bounce(out)
```